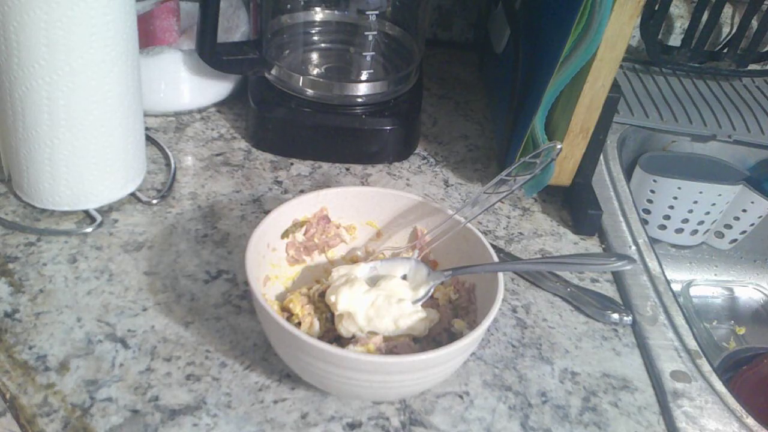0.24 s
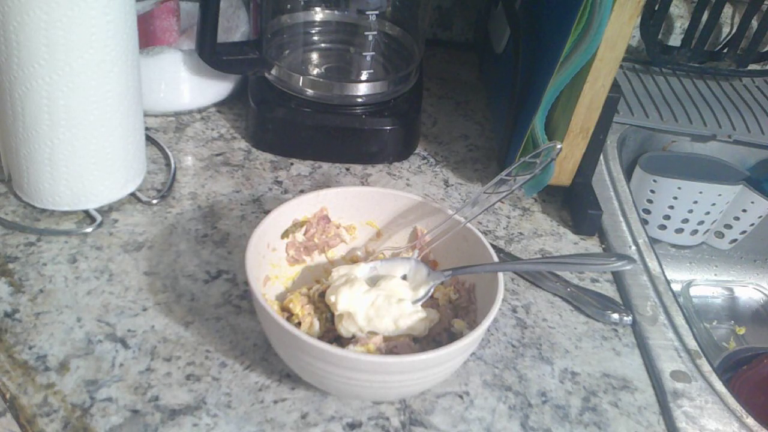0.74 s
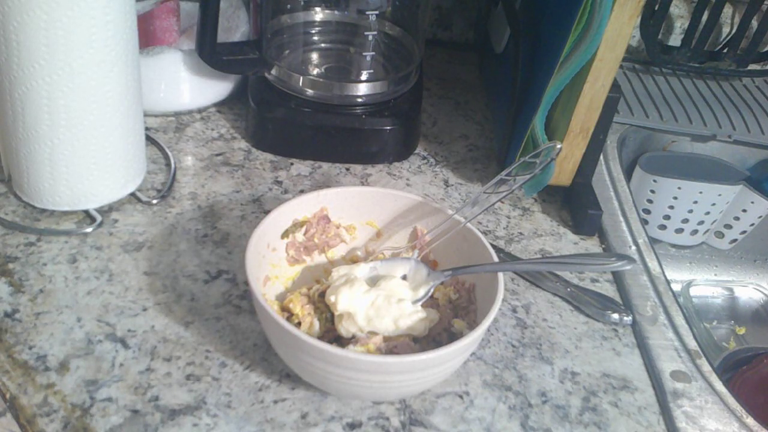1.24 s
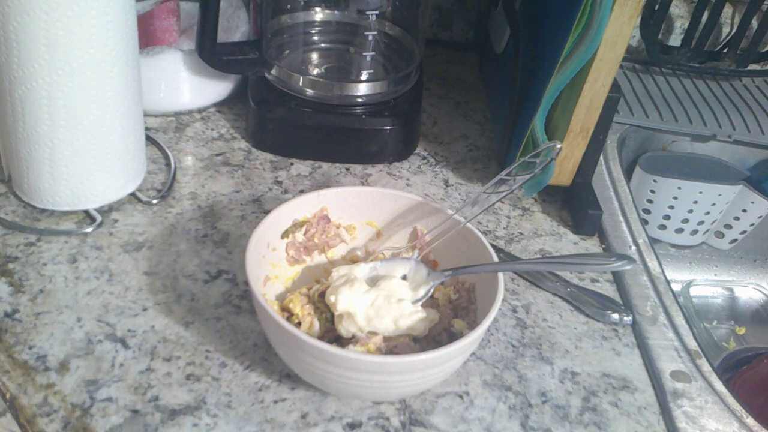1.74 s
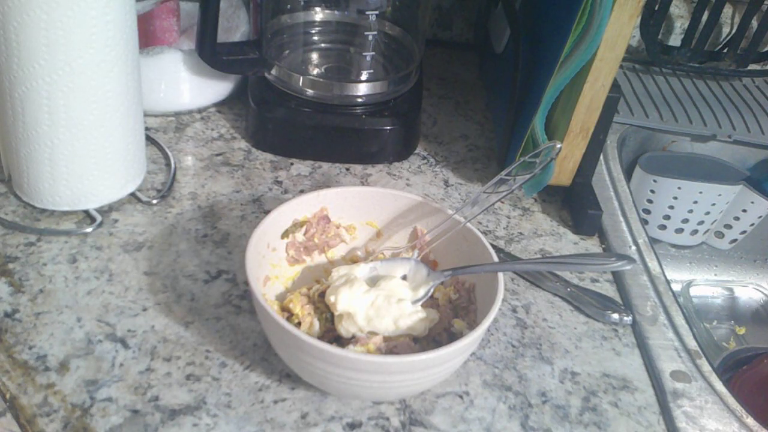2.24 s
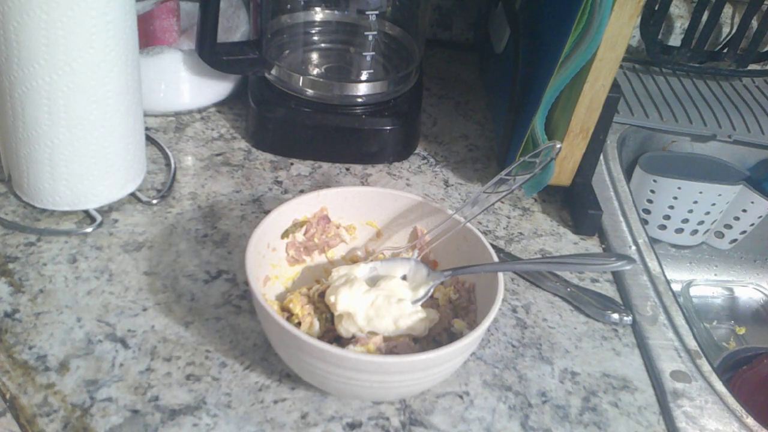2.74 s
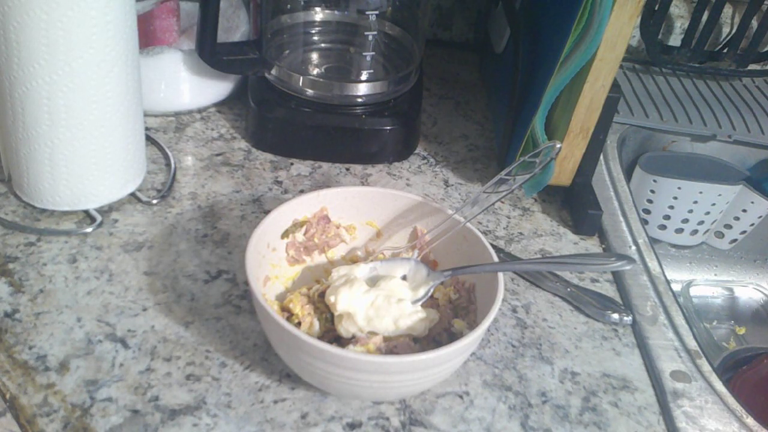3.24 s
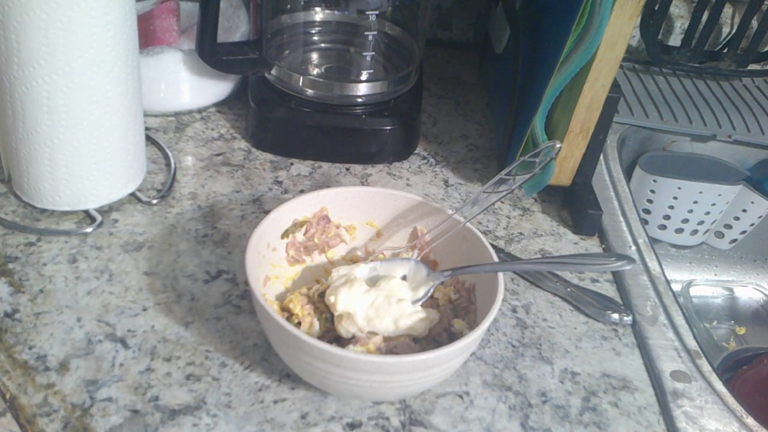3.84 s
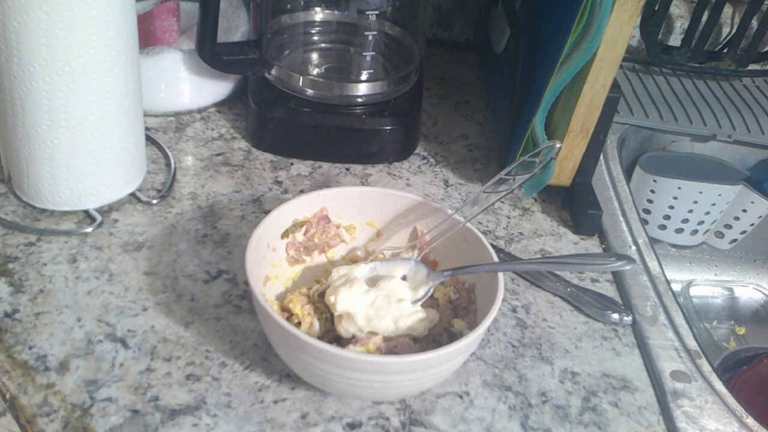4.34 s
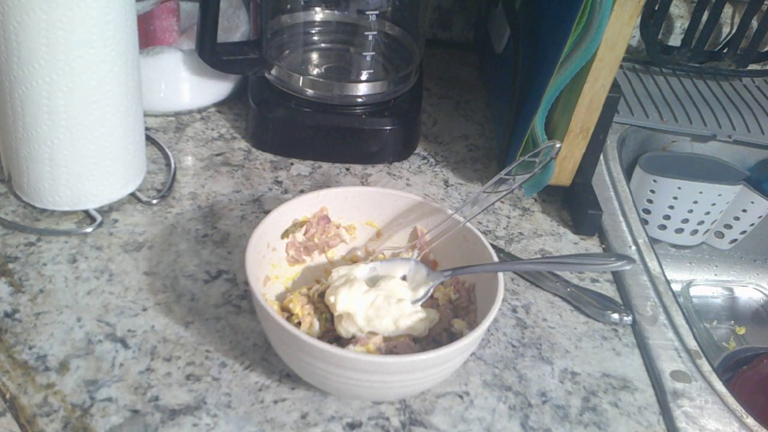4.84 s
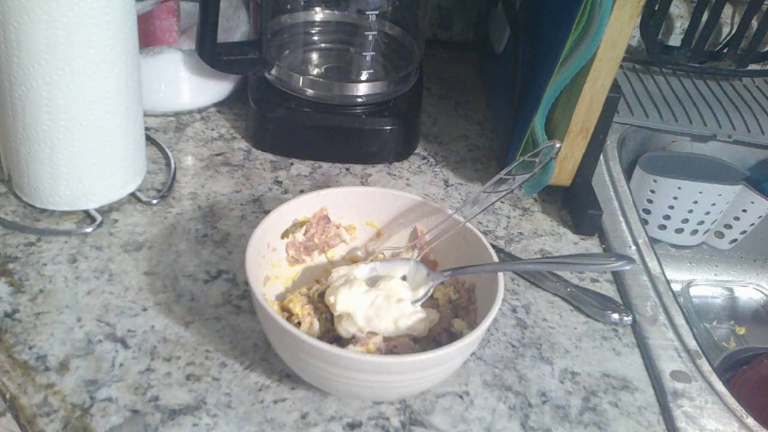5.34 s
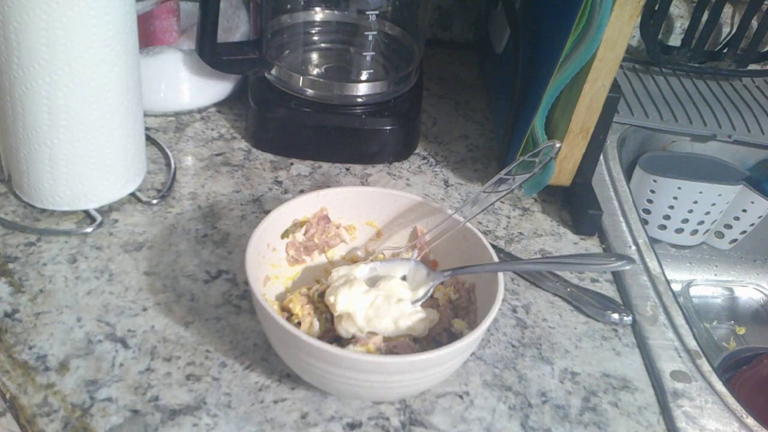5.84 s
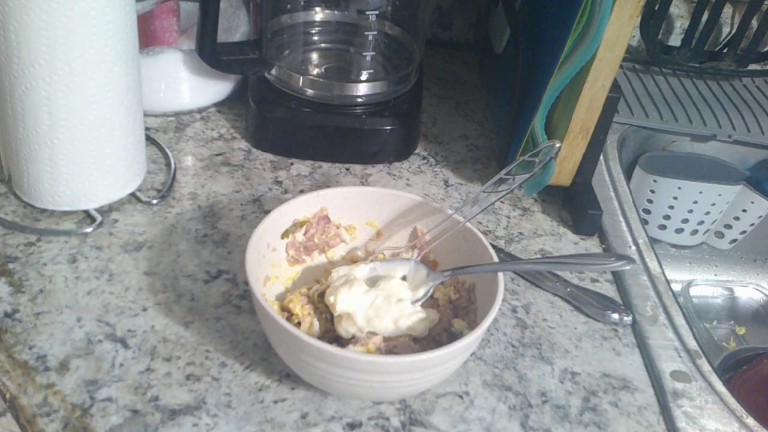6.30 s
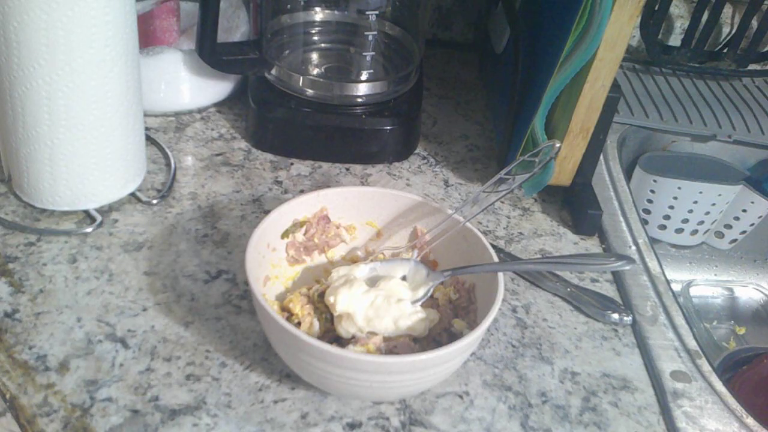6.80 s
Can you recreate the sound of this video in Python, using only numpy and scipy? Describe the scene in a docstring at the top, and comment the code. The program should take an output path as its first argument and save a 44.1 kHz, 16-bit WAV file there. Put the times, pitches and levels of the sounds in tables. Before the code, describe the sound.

Over a low refrigerator hum, faint handling taps and rubs, then two door thumps, jar clinks and a burst of container knocks in a small kitchen.

```python
"""Refrigerator in a small kitchen

Faint handling taps and rubs, a rustling door seal, two door thumps, a clinking jar, knocked containers.
Struck bodies: third-octave noise bands plus decaying sine modes. Rubs: grainy noise strokes.
Throughout: wavering hum tones over coloured noise, low-passed as by a phone across the counter."""
import sys
import numpy as np
from scipy import signal
from scipy.fft import rfft, irfft, next_fast_len
from scipy.io import wavfile

SR = 44100
rng = np.random.default_rng(int(sys.argv[2]) if len(sys.argv) > 2 else 0)


def store_pcm(level_fs):
    """Save levels as 16-bit WAV."""
    pcm = np.round(np.clip(level_fs, -1, 1) * 32767).astype(np.int16)
    wavfile.write(sys.argv[1], SR, np.atleast_2d(pcm).T)


N = 311602
TIME = np.arange(N) / SR

# Refrigerator motor tones: (frequency [Hz], rms level [dB])
HUM_TONES = [(193.8, -57), (484.5, -73.5)]
# Machine rumble spectrum: (frequency [Hz], relative density [dB per Hz])
RUMBLE_COLOUR = [(15, 3.5), (30, -2.5), (55, 1.5), (100, 4.5), (150, 6.5), (210, 5.5), (270, -3.5),
                 (400, -80)]
# Steady room noise spectrum: (frequency [Hz], relative density [dB per Hz])
ROOM_COLOUR = [(140, -27.5), (240, -2.5), (271, -4), (382, -3), (418, -11), (478, -12.5), (664, -11),
               (924, -16.5), (1470, -16), (4940, -30), (6970, -25), (8600, -38), (11200, -71.5),
               (18900, -120)]
# Rubbing noise spectrum: (frequency [Hz], relative density [dB per Hz])
RUB_COLOUR = [(100, -8), (300, 7), (800, 4.5), (1700, 3.5), (3000, -1), (5000, -13.5), (7500, -7.5),
              (8600, -30)]
# Strokes on packaging and door seal: (start [s], length [s], level before sag [dB])
RUBS = [(0.307, .1, -58.5), (.75, 0.067, -61), (0.934, 0.045, -58.5), (1.108, 0.09, -61.5),
        (3.185, 0.16, -48.5), (3.658, .07, -57.5), (3.946, .03, -61), (4.056, 0.13, -61)]

# Strikes: (time [s], level [dB], bass tilt [dB], treble tilt [dB], struck-spot resonance [Hz])
# Light taps of things being handled
SMALL_TAPS = [(.148, -64, -2, 2, 1700), (.388, -58.5, 1, -3, 300), (.432, -53.5, 5, -5, 1190),
              (.697, -59, -7, -2, 1200), (.768, -63.5, 6, 0, 1100), (.992, -66, 9, 3, 2200),
              (1.123, -67.5, -3, 5, 5500), (1.328, -68, -2, 3, 1900), (1.683, -63.5, 5, 0, 330),
              (2.083, -54, -3, -6.5, 1600), (2.486, -73, -7, 9, 2700), (4.118, -59.5, 5, -9, 1500),
              (4.222, -63.5, 11, -6, 806)]
# Blows on the door
DOOR_BLOWS = [(3.279, -53.5, 4, 0, 269), (3.308, -66, -3, 7, 258), (3.384, -55.5, 7, 2, 1300),
              (3.411, -45.5, -15, -8, 500), (3.447, -33, 4.5, -1.5, 304), (3.479, -36, 0, -7, 400),
              (3.735, -64, 12, -2, 700), (3.763, -35.5, 1, -5.5, 753), (3.780, -42.5, 1, -3, 420),
              (4.062, -61.5, 2.5, 0.5, 338)]
# Jar clinks against a shelf
JAR_CLINKS = [(4.808, -41.5, 3.5, -2, 2160), (4.985, -41.5, 7.5, -0.5, 1400),
              (5.123, -39.5, 2.5, -4.5, 940), (5.160, -49, 16, -6, 1700)]
# Containers knocked on shelves and on each other
CONTAINER_KNOCKS = [(4.879, -46, 1, 3, 493), (5.050, -59, 7, -2, 258), (5.074, -47, -26, -5, 1050),
                    (5.125, -38, -20, 5.5, 950), (5.191, -36.5, 3, 6.5, 577), (5.236, -48, -13, 4, 720),
                    (5.835, -46.5, 2, -0.5, 750), (5.886, -39, -3, -4, 580), (5.942, -48, 3, -3, 557),
                    (5.996, -51, 4, 2, 757), (6.125, -56, -5, -7, 700), (6.229, -53, -2, 10, 496),
                    (6.248, -66.5, 26.5, 10, 255), (6.296, -36.5, 1, 2, 1940), (6.376, -39, -5, -9, 1200),
                    (6.423, -29.5, -0.5, -6, 1260), (6.440, -39.5, 2, -3, 410), (6.470, -29, -7, -1, 900),
                    (6.484, -35, -1, 1, 450), (6.573, -50, -5, 0, 950), (6.615, -45.5, 1, -1, 740),
                    (6.699, -52.5, -1, 3, 740)]

# Crowd of close resonances of each body: (frequency [Hz], density [dB per Hz])
# Handled things
TAP_BODY = [(100, -18.5), (280, 5.5), (600, 3.5), (1300, -6), (2300, -3), (4000, -14.5), (8500, -44)]
# Door
DOOR_BODY = [(90, -13), (160, -33.5), (205, 9.5), (300, 2.5), (420, 8), (560, 4), (750, 5), (1000, -2.5),
             (1400, -1), (2100, -2.5), (2900, -6), (4600, -22.5), (6500, -17.5), (8500, -35)]
# Jar
JAR_BODY = [(100, -12), (180, -14.5), (250, -3.5), (350, -9), (500, -4.5), (950, -2.5), (1600, -6),
            (2300, -7.5), (3100, -21.5), (4000, -16.5), (5000, -34), (6800, -22), (8500, -51)]
# Containers
CONTAINER_BODY = [(100, -20.5), (190, -6.5), (310, -5.5), (420, -4), (520, 2), (620, -5), (760, -3.5),
                  (1000, -9.5), (1500, -8.5), (2200, -16), (3100, -19.5), (4200, -36), (7000, -32.5),
                  (8500, -52)]

# Strong single modes of each body: (frequency [Hz], level [dB], t60 [s])
# Handled things
TAP_MODES = [(1230, -11, 0.19)]
# Door
DOOR_MODES = [(204.6, -9, 0.46), (242.3, -1.5, 0.28), (303, 8.5, 0.19), (332.7, -2, 0.19),
              (365.3, 2.5, 0.27), (387.2, -1.5, 0.34), (427, -8.5, 0.18), (497.5, -4.5, 0.21),
              (584, -13, 0.26), (650, -3, 0.29), (667, -6, 0.37), (778, -3.5, 0.19), (884, -19.5, 0.53),
              (1104, -9, 0.27), (1240, -23, 0.17), (1667, -17.5, 0.36), (2125, -12, 0.24),
              (2170, -15, 0.28), (3000, -20, .2)]
# Jar
JAR_MODES = [(930, -7, 0.38), (1043, -14, 0.58), (1203, -11, 0.35), (1270, -8, 0.25), (1534, -20.5, 0.45),
             (1715, -11.5, 0.22), (1870, -13.5, 0.19), (2050, -10, 0.22), (1354, 0, .36), (2222, -6, .3),
             (2800, -13, .34), (3755, -10, .2), (3942, -11, .2), (3700, -15, .2), (3900, -14, 0.16),
             (5350, -24, 0.24), (6640, -27, .28), (7300, -23.5, 0.32), (7520, -23, 0.3)]
# Containers
CONTAINER_MODES = [(301.6, -6.5, 0.21), (408, -8.5, 0.16), (459.6, -1.5, 0.17), (506.8, -2.5, 0.17),
                   (522.3, -1, 0.26), (684, -13.5, 0.39), (736.7, -2, 0.17), (778, -12, 0.21),
                   (1045, -16, 0.3), (1285, -14, 0.18), (1583, -15, 0.26), (2890, -27.5, 0.31)]

RUMBLE_DB, ROOM_NOISE_DB = -59, -59
RUB_ATTACK_S, RUB_SAG_DB_PER_S, RUB_RELEASE_T60_S = 0.028, 30, 0.51
TREBLE_DAMPING = 0.045  # exponent: higher bands die sooner
CRACK_DB_PER_OCTAVE = 2.3  # the first crack is brighter than the ring
SOFT_BUILD = 0.18  # exponent of strength: gentler blows build up more slowly
SPOT_OCTAVES = 1 / 3  # Gaussian width of the struck spot's resonance
TOP_HZ = 8850


def undb(db):
    """Decibels to gain."""
    return 10 ** (np.asarray(db) / 20)


def unit(x):
    """Scale to rms 1."""
    return x / np.sqrt(np.mean(x ** 2))


def colour_at(hz, points):
    """Gain of a (Hz, dB) spectrum, interpolated over log frequency."""
    points_hz, points_db = np.transpose(points)
    return undb(np.interp(np.log(np.maximum(hz, 1)), np.log(points_hz), points_db))


def noise(points):
    """White noise shaped to a spectrum, rms 1."""
    size = next_fast_len(N)
    spectrum = rfft(rng.standard_normal(size))
    gain = colour_at(np.fft.rfftfreq(size, 1 / SR), points)
    return unit(irfft(spectrum * gain, size)[:N])


def walk(rate_hz):
    """Random wander, rms 1: straight lines between rate_hz random points a second."""
    return unit(np.interp(TIME * rate_hz, np.arange(N), rng.standard_normal(N)))


def fade(t, t60_s):
    """Exponential decay by 60 dB in t60_s, floored at 5 ms."""
    return np.exp(-np.log(1000) * t / np.maximum(t60_s, .005))


def hum(waver_db=0.6, drift_hz=0.41):
    """Motor tones sharing a drifting clock and a wavering level; drift_hz is rms at the first tone."""
    clock = TIME + np.cumsum(drift_hz * walk(3.2)) / SR / HUM_TONES[0][0]
    tones = sum(undb(db) * np.sqrt(2) * np.sin(2 * np.pi * hz * clock) for hz, db in HUM_TONES)
    return tones * undb(waver_db * walk(4.9))


def room_noise():
    """Low machine rumble under steady, soft broadband noise."""
    rumble = undb(RUMBLE_DB) * noise(RUMBLE_COLOUR)
    return rumble + undb(ROOM_NOISE_DB) * noise(ROOM_COLOUR)


def diffuse_bands():
    """Third-octave noises: the kitchen's dense reflections, band by band."""
    centres_hz = 100 * 2 ** (np.arange(20) / 3)
    edges = 2 ** (np.array([-1, 1]) / 6)
    filters = [signal.butter(3, hz * edges, "band", fs=SR, output="sos") for hz in centres_hz]
    return centres_hz, np.array([signal.sosfilt(sos, rng.standard_normal(N)) for sos in filters])


def contact(hz, bass_db, treble_db, spot_hz, spot_db):
    """Heavy, soft contact is bassy, hard contact bright; the struck spot lifts one region."""
    tilt_db = np.interp(np.log(hz), np.log([300, 700, 1200, 2600]), [bass_db, 0, 0, treble_db])
    octaves_off = np.log2(hz / spot_hz)
    return undb(tilt_db + spot_db * np.exp(-.5 * (octaves_off / SPOT_OCTAVES) ** 2))


def blows(table, body, modes, diffuse, build_s, t60_s, crack_db, crack_t60_s, spot_db):
    """Blows crack and wake a body's modes; reflections build up in milliseconds, then die away.

    build_s holds for the strongest blow; t60_s and crack_db hold for the band near 1 kHz."""
    centres_hz, bands = diffuse
    mode_hz, mode_db, mode_t60_s = np.transpose(modes)
    t = np.arange(SR // 3) / SR  # each blow is cut off after 1/3 s
    early = t < .04

    relative_hz = centres_hz / centres_hz[10]
    band_t60_s = t60_s * relative_hz ** -TREBLE_DAMPING
    crack = undb(crack_db + CRACK_DB_PER_OCTAVE * np.log2(relative_hz))
    decay = fade(t, band_t60_s[:, None]) + crack[:, None] * fade(t, crack_t60_s)
    share = colour_at(centres_hz, body) * np.sqrt(centres_hz / 4000)  # wider bands hold more power

    strongest_db = max(row[1] for row in table)
    out = np.zeros(N + len(t))
    for start_s, db, bass_db, treble_db, spot_hz in table:
        touch = bass_db, treble_db, spot_hz, spot_db

        offset = rng.integers(len(t), N - len(t))
        wash = bands[:, offset:offset + len(t)]
        early_rms = np.sqrt(np.mean(wash[:, early] ** 2, axis=1, keepdims=True))
        crowd = (share * contact(centres_hz, *touch)) @ (decay * wash / early_rms)

        phase = rng.uniform(0, 2 * np.pi, (len(modes), 1))
        rings = np.sin(2 * np.pi * mode_hz[:, None] * t + phase) * fade(t, mode_t60_s[:, None])
        ring = (undb(mode_db) * contact(mode_hz, *touch)) @ rings

        rise_s = build_s * undb(-SOFT_BUILD * (db - strongest_db))
        attack = np.minimum(t / rise_s, 1)
        i = int(start_s * SR)
        out[i:i + len(t)] += undb(db) * (crowd + ring) * attack
    return out[:N]


def small_taps(diffuse):
    """Handled things: a broad wash with one ringing mode."""
    return blows(SMALL_TAPS, TAP_BODY, TAP_MODES, diffuse, build_s=0.0065, t60_s=0.26,
                 crack_db=0.5, crack_t60_s=0.035, spot_db=8.5)


def stroke(start_s, length_s):
    """Envelope of one rub: it grips, eases as it slides, then dies away in the room."""
    t = np.maximum(TIME - start_s, 0)
    held = np.minimum(t, length_s)
    attack = np.minimum(t / RUB_ATTACK_S, 1)
    return attack * undb(-RUB_SAG_DB_PER_S * held) * fade(t - held, RUB_RELEASE_T60_S)


def rubbing(grain_db=1.5, grain_rate_hz=400):
    """Rubber and plastic stick and let go in tiny uneven steps: noise with a grainy level."""
    pressure = sum(undb(db) * stroke(start_s, length_s) for start_s, length_s, db in RUBS)
    grains = undb(grain_db * walk(grain_rate_hz))
    return unit(noise(RUB_COLOUR) * grains) * pressure


def door_thumps(diffuse):
    """Door: a strong crack, then many low modes."""
    return blows(DOOR_BLOWS, DOOR_BODY, DOOR_MODES, diffuse, build_s=0.0057, t60_s=0.33,
                 crack_db=1.5, crack_t60_s=0.033, spot_db=5.5)


def jar_clinks(diffuse):
    """Jar: little crack, modes reaching high into the treble."""
    return blows(JAR_CLINKS, JAR_BODY, JAR_MODES, diffuse, build_s=0.0056, t60_s=0.45,
                 crack_db=-16, crack_t60_s=0.042, spot_db=2.0)


def container_knocks(diffuse):
    """Containers: a brief crack and mostly low and middle modes."""
    return blows(CONTAINER_KNOCKS, CONTAINER_BODY, CONTAINER_MODES, diffuse, build_s=0.0044, t60_s=0.29,
                 crack_db=-5.5, crack_t60_s=0.015, spot_db=5.5)


def scene():
    """Sum of all sources, one channel."""
    diffuse = diffuse_bands()
    background = hum() + room_noise()
    handling = small_taps(diffuse) + rubbing()
    strikes = door_thumps(diffuse) + jar_clinks(diffuse) + container_knocks(diffuse)
    return (background + handling + strikes)[None]


def record(dry):
    """The phone rounds off the top, then cuts it steeply."""
    rounded = signal.sosfilt(signal.butter(14, 8600, fs=SR, output="sos"), dry)
    return signal.sosfilt(signal.ellip(10, .2, 70, TOP_HZ, fs=SR, output="sos"), rounded)


dry = scene()
out = record(dry)
store_pcm(out)
```